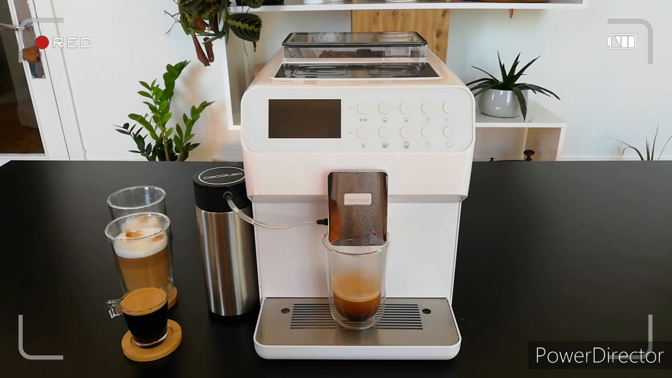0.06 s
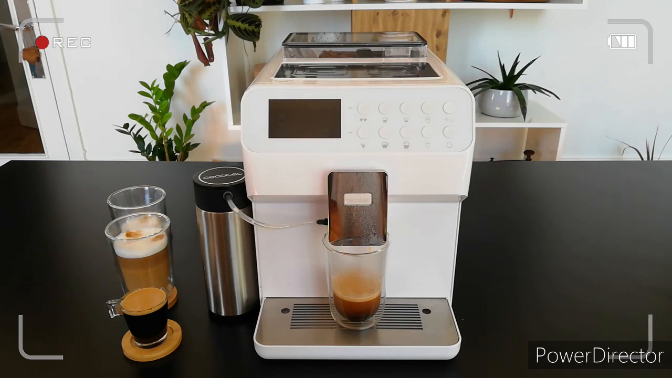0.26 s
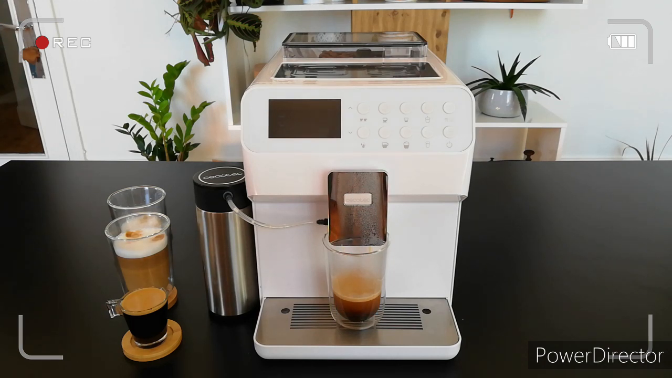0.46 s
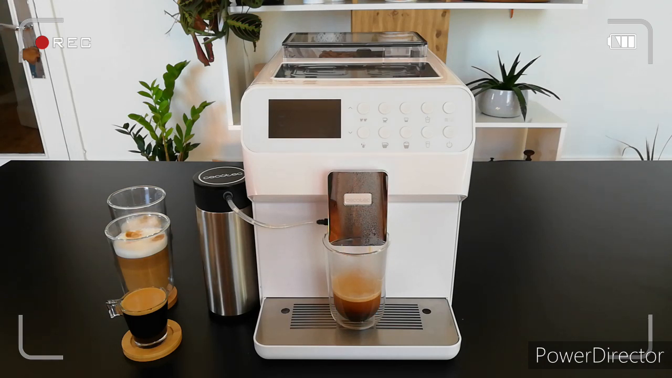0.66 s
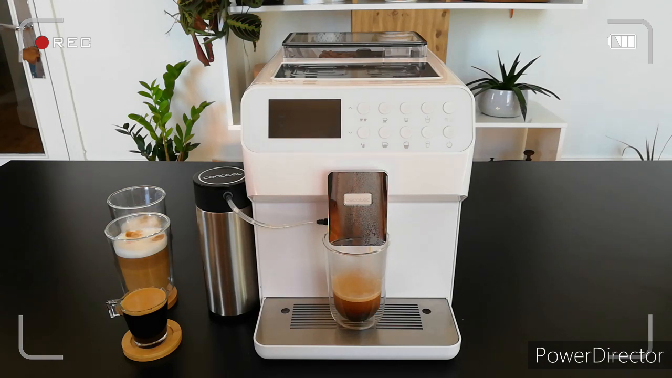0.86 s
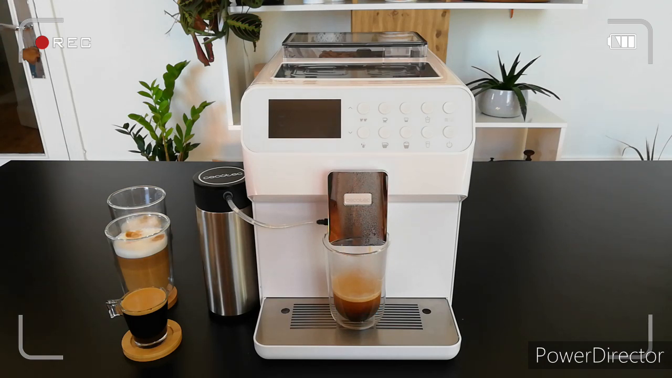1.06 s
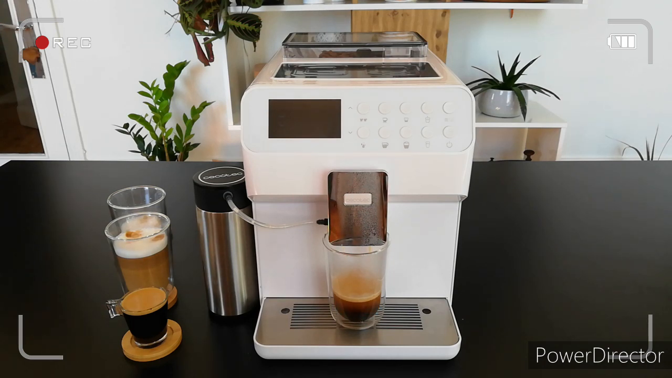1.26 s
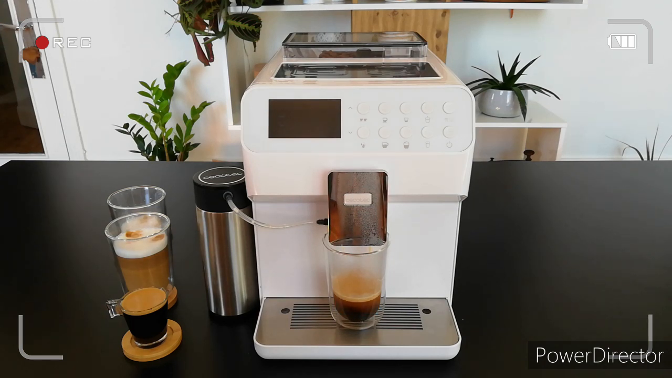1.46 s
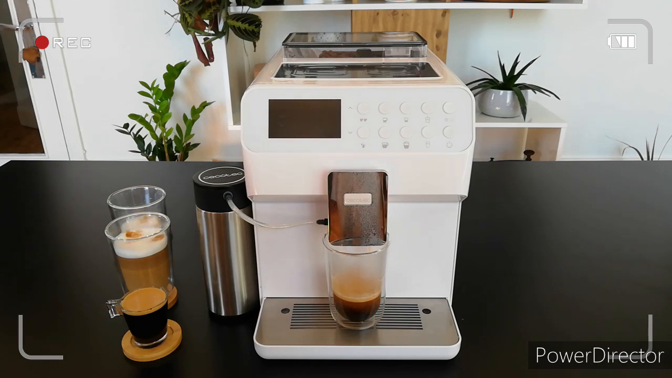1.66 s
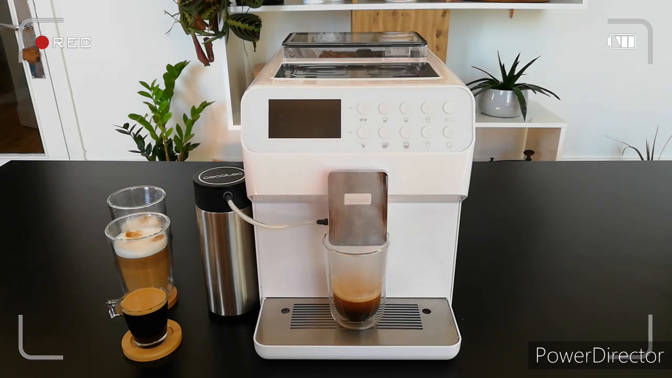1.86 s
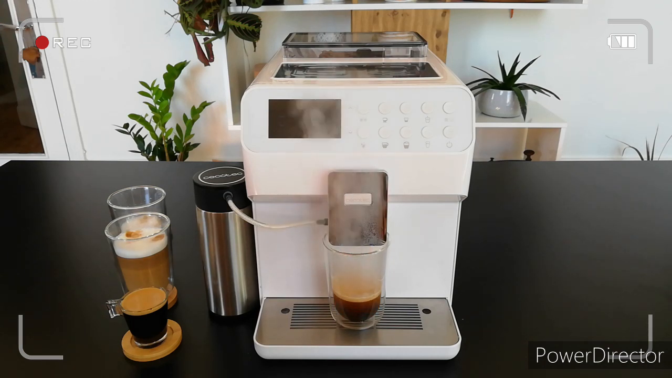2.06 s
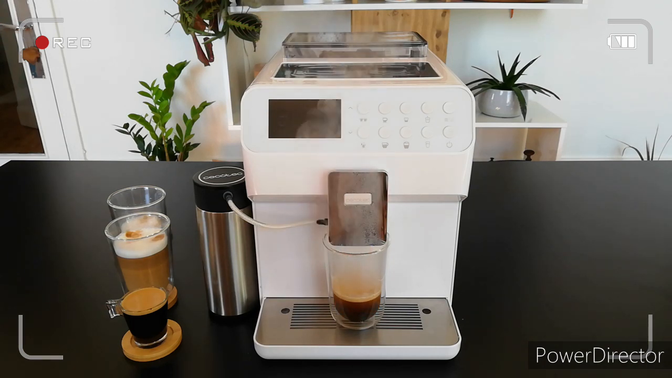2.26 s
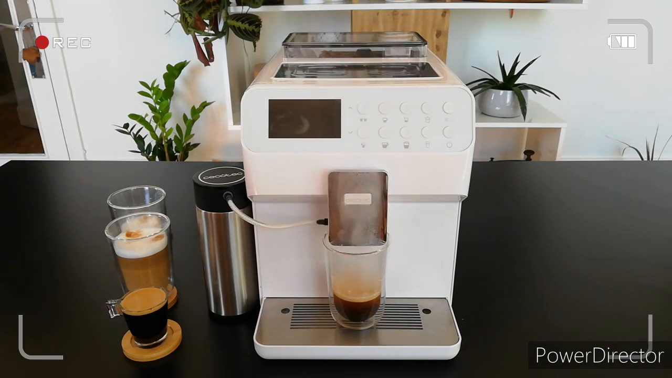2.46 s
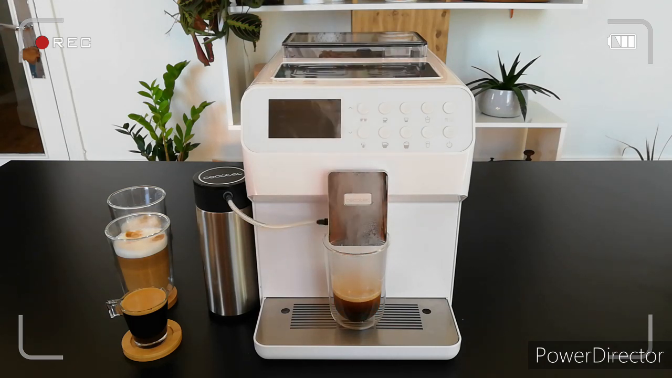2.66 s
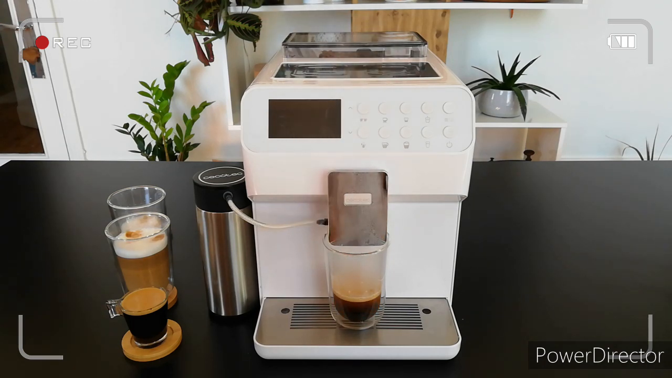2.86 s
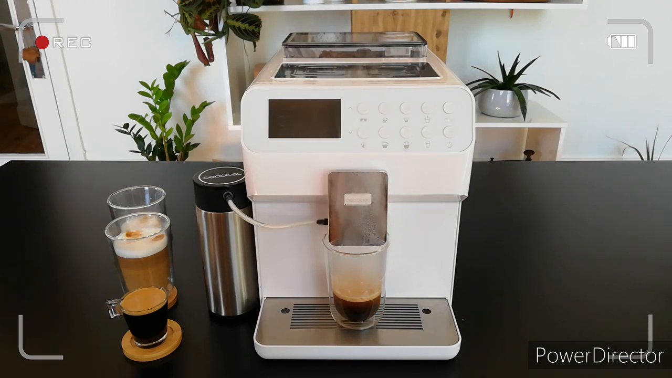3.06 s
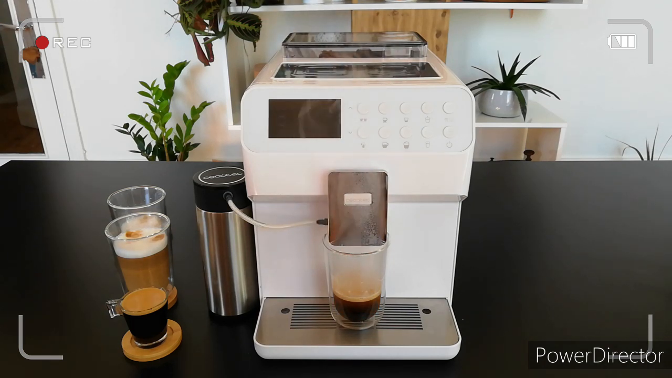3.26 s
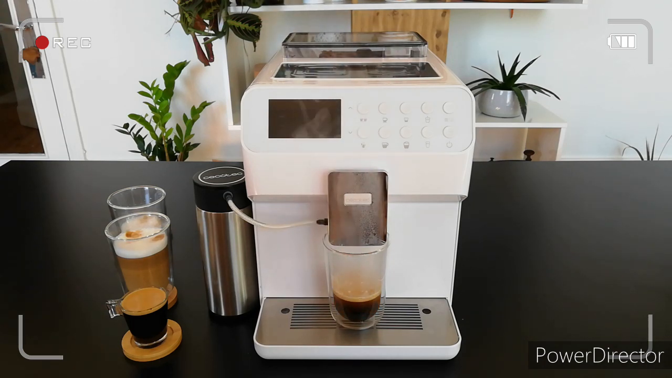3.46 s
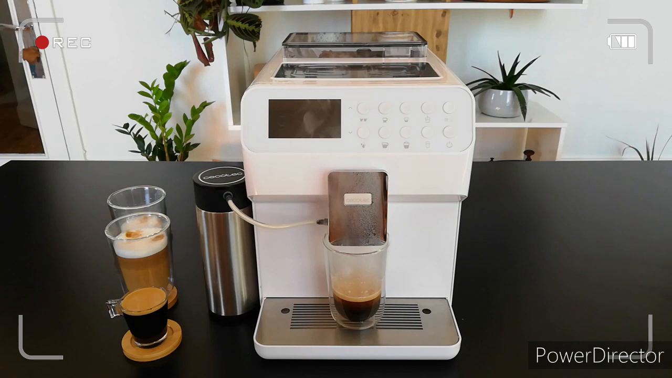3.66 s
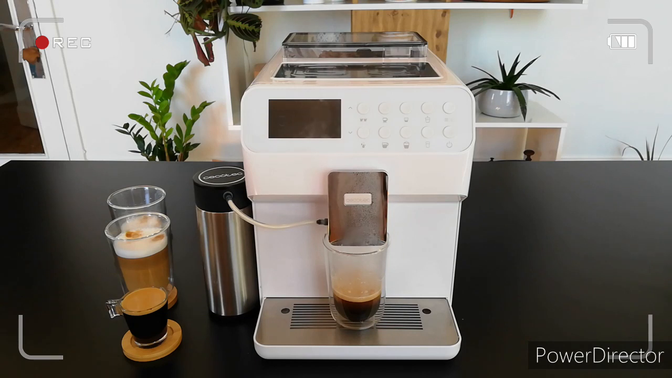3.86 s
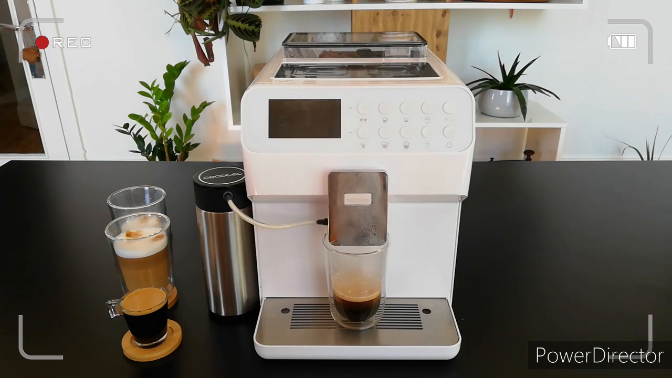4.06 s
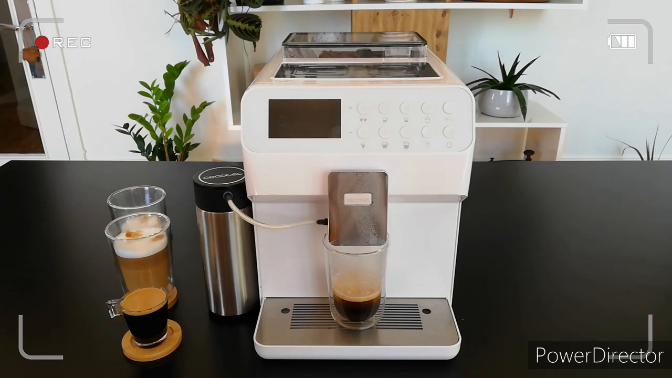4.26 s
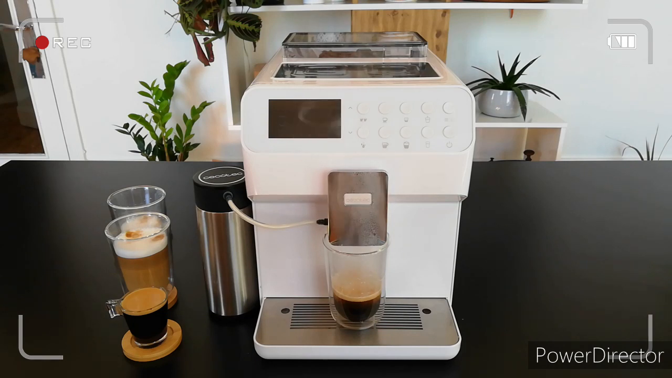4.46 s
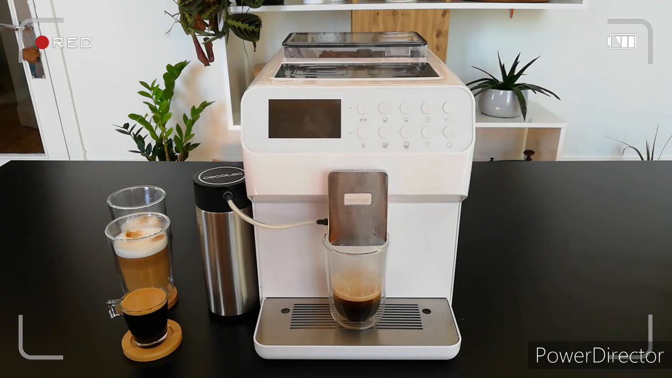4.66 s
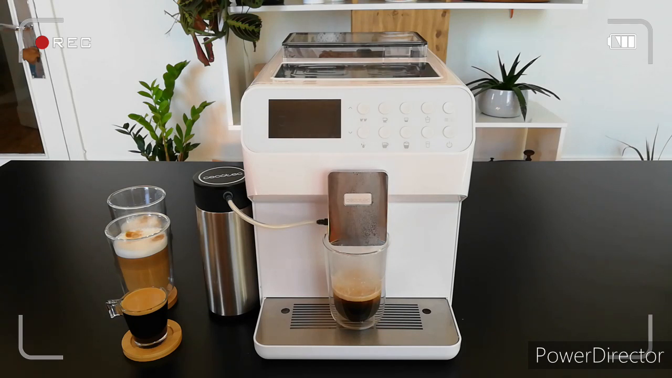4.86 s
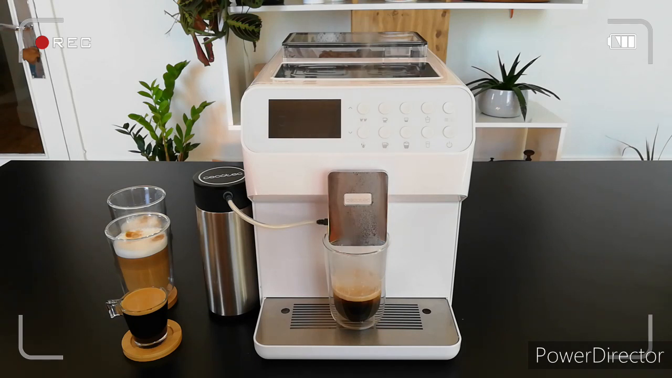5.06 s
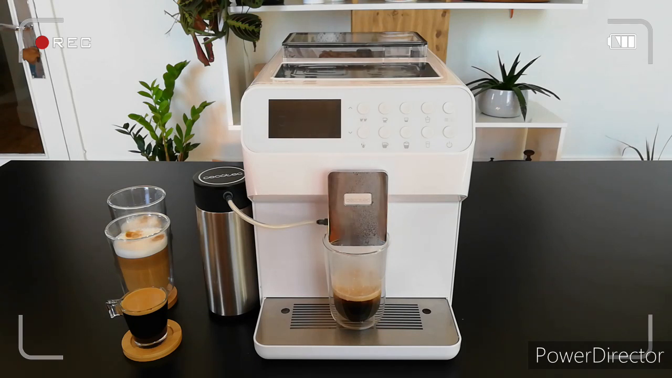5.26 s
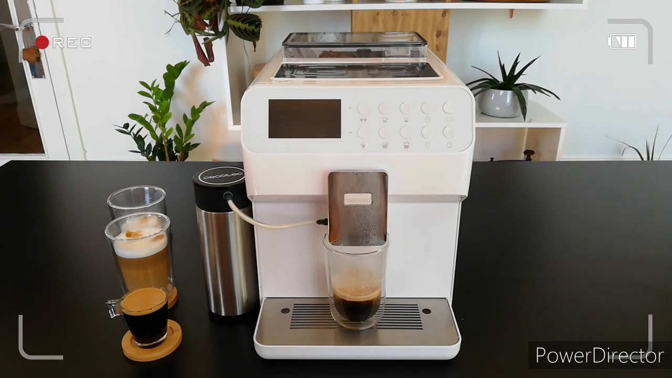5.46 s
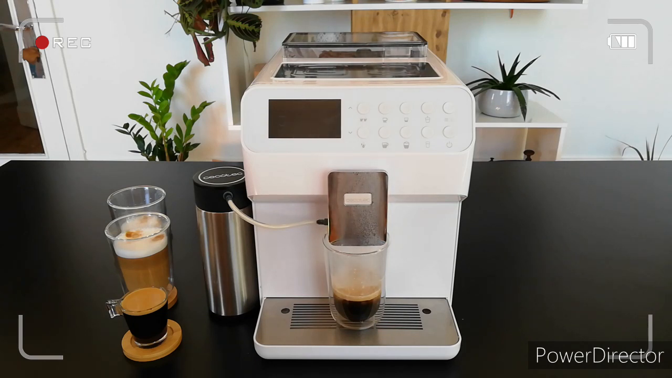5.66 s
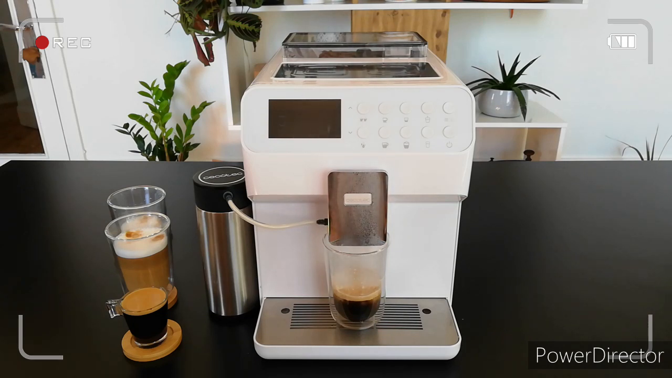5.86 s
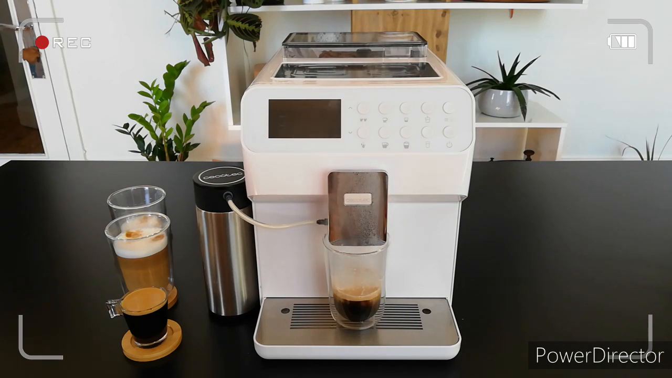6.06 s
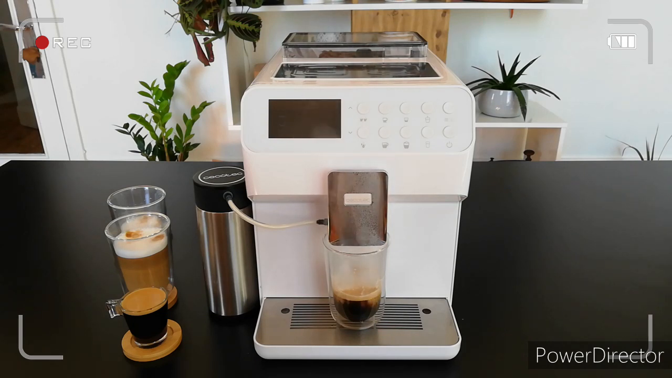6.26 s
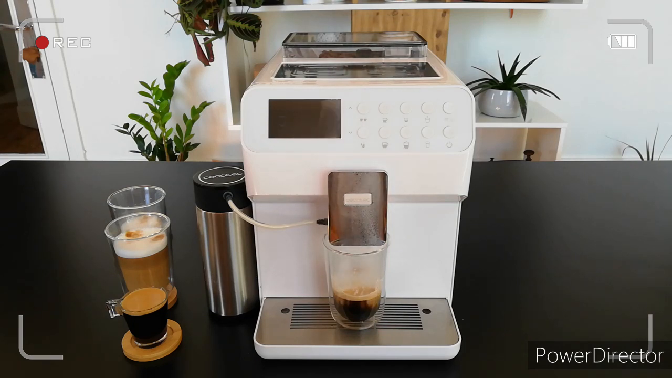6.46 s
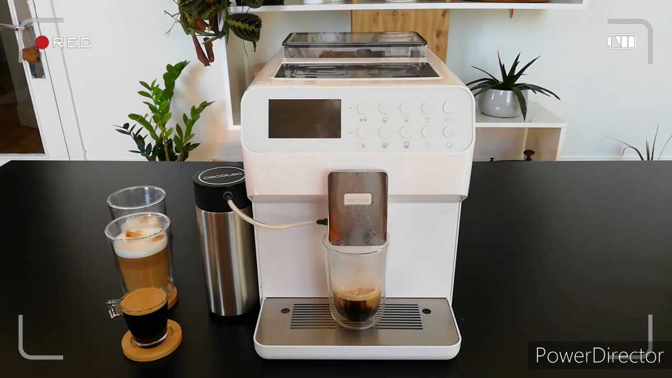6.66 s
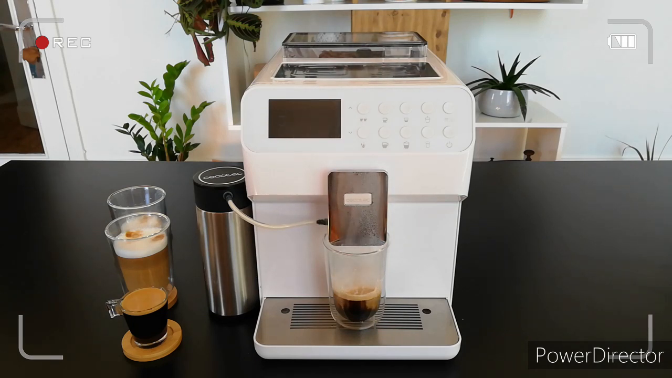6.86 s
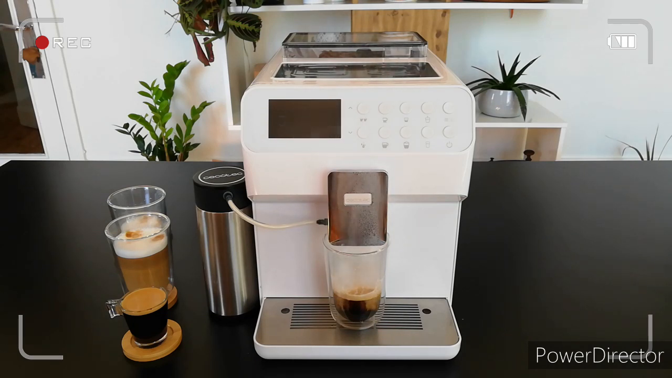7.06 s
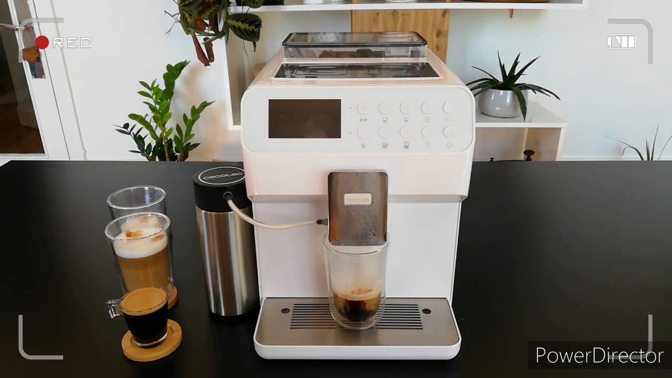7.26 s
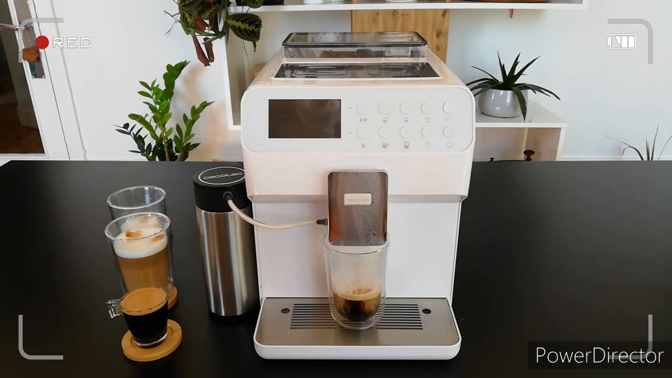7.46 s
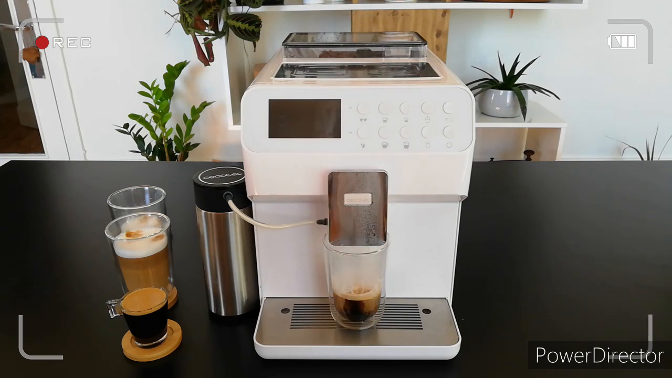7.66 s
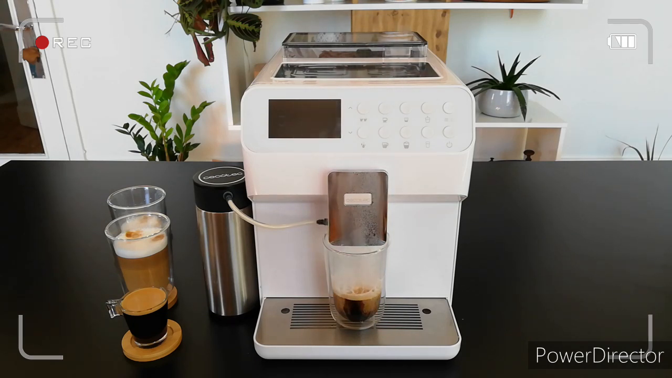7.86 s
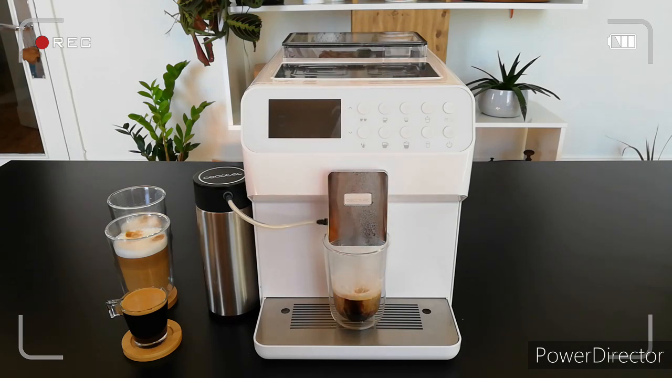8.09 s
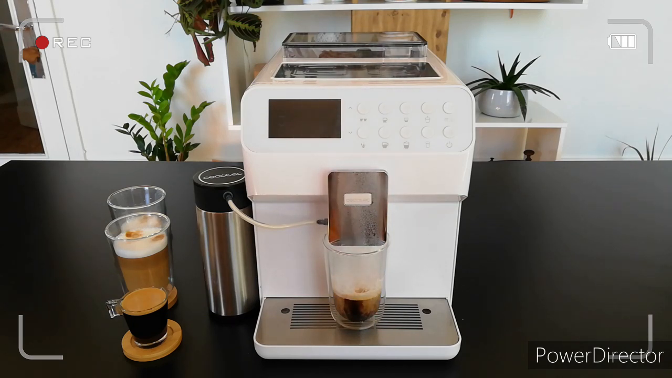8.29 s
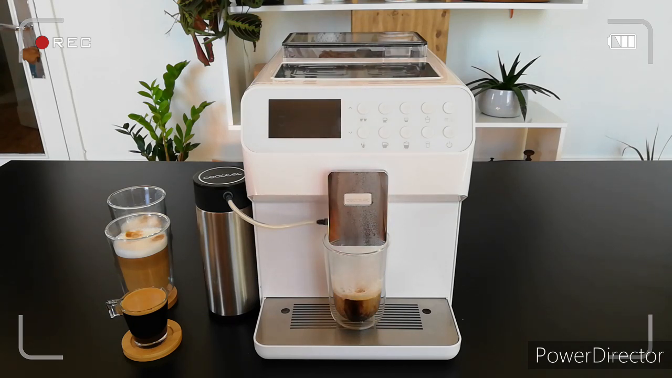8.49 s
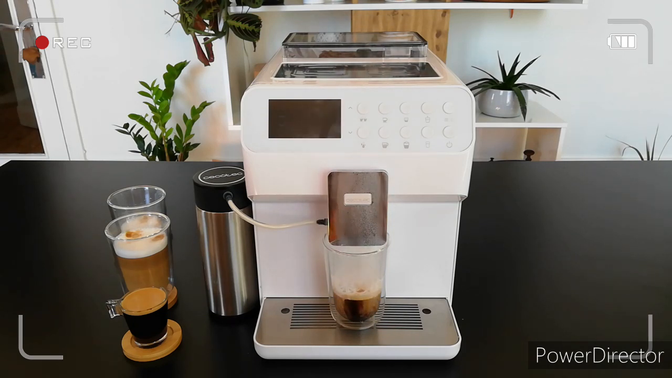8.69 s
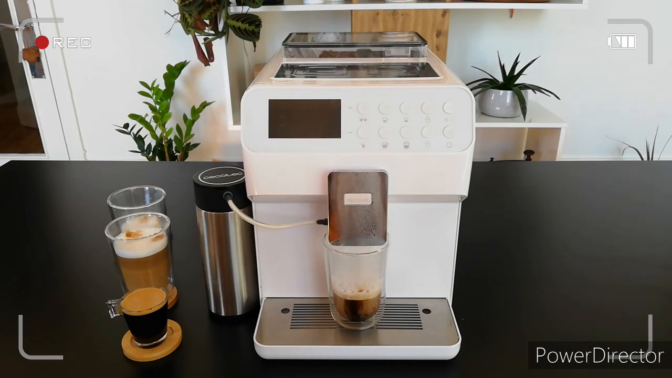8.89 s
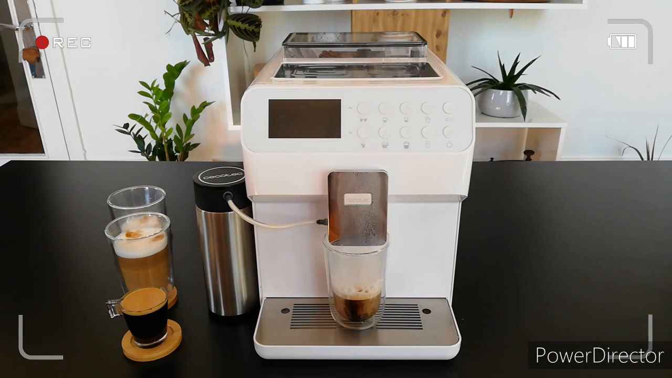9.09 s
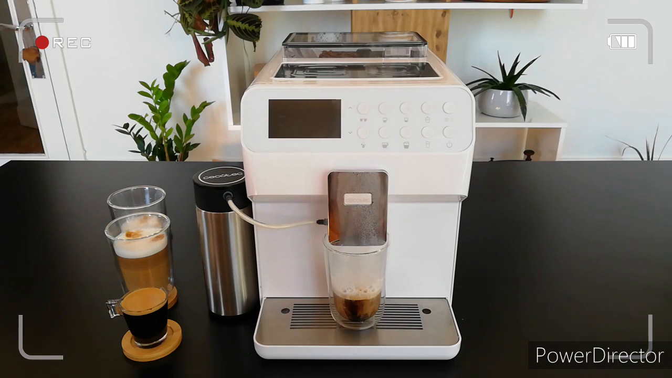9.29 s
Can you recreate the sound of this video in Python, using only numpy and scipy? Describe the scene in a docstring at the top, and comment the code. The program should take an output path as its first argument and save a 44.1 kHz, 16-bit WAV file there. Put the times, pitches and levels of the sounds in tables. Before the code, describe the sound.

Coffee machine whines briefly with plastic clicks, releases a burst of steam, then settles into steady hissing, bubbling milk froth with sputters and gurgles.

```python
"""An automatic coffee machine froths milk into a glass on a kitchen table.
A small geared motor (a harmonic series on a speed curve) whines and clicks as it sets the valve.
It twitches once more, a relay ticks, and the steam valve snaps open in a puff of shaped noise.
Steam hisses and spits (noise with droplets); milk bubbles (damped sines) burst in the spout
and gurgle into the glass. Faint hums and room noise lie beneath."""
import sys
import numpy as np
from scipy import signal
from scipy.fft import rfft, irfft, next_fast_len
from scipy.io import wavfile
from scipy.ndimage import uniform_filter1d, map_coordinates

SR = 44100
rng = np.random.default_rng(int(sys.argv[2]) if len(sys.argv) > 2 else 0)


def log_audio(samples):
    """Write samples as a 16-bit WAV file to the path given in sys.argv[1]."""
    # one column per channel
    frames = np.atleast_2d(samples).T
    # limit to full scale, then quantise
    limited = np.clip(frames, -1, 1)
    pcm = np.round(limited * 32767).astype(np.int16)
    wavfile.write(sys.argv[1], SR, pcm)


N = 411453

# spectra below list: f/Hz, density/dB (relative; the noise is scaled to rms 1)
# valve motor speed: t/s, gear pitch/Hz
MOTOR_SPEED = [(0.11, 128.3), (0.148, 136.3), (0.2, 141.8), (0.272, 141.8), (0.34, 144.7), (0.43, 149),
               (0.8, 147.7), (0.845, 146.8), (0.882, 134), (0.912, 133), (0.95, 136), (0.98, 132.5)]
# housing noise spectrum: f/Hz, density/dB
HOUSING_SPECTRUM = [(53, -47), (90, -31), (144, 2.5), (311, 1), (468, -3), (870, -3), (990, -10),
                    (1340, -5), (2230, -4.5), (4720, -20), (7730, -24), (8420, -23), (15000, -46)]
# gulps of milk reach the steam and boil up: t/s, length/s, lift/dB
MILK_SURGES = [(2.1, 0.12, 1.5), (2.165, 0.3, 7), (2.385, 0.099, 5), (2.505, 0.094, 2.5), (2.95, 0.16, 2.5),
               (3.64, 0.2, 2), (4.872, 0.21, 3.5), (5.068, 0.14, 2.5), (5.444, 0.29, 1.5), (5.628, 0.2, 3),
               (7.076, 0.14, 3), (7.97, 0.034, 6)]
VALVE_S = 1.596  # steam valve opens
CLEAR_S = 0.0055  # time the nozzle takes to clear
SWELL_S = 0.036  # rise time of a gulp or glug
FOAM_S, FOAM_BUILD_S = 2.33, 5.43  # foam starts to build; build time


def amp(db):
    """Decibels to gain."""
    return 10 ** (np.asarray(db) / 20)


def unit(x):
    """Scale to rms 1."""
    return x / np.sqrt(np.mean(x ** 2) + 1e-20)


def along(points, hz):
    """(Hz, value) points read on a log frequency axis."""
    f, v = np.transpose(points)
    return np.interp(np.log(hz + 1), np.log(f + 1), v)


def clock():
    """Time of each sample in s."""
    return np.arange(N) / SR


def curves(rows):
    """One value per sample for each column after the time."""
    s, *cols = np.transpose(rows)
    return [np.interp(clock(), s, c) for c in cols]


def ramp(start, length):
    """Rise from 0 to 1."""
    return np.clip((clock() - start) / length, 0, 1)


def swell(start, attack, hold, release):
    """Rise from 0 to 1, hold and fall back."""
    return ramp(start, attack) * (1 - ramp(start + attack + hold, release))


def wobble(rate, size=N):
    """Smooth random curve, rate knots per second."""
    coarse = np.arange(0, size + 64, 64)
    knots = rng.standard_normal(int(size * rate / SR) + 4)
    return np.interp(np.arange(size), coarse, map_coordinates(knots, [coarse * rate / SR]))


def resonance(hz, centre_hz, half_width_hz):
    """Bell of height 1 around a resonance."""
    return 1 / (1 + ((hz - centre_hz) / half_width_hz) ** 2)


def filtered(x, response):
    """x times a response of frequency."""
    size = next_fast_len(N + SR // 2)
    return irfft(rfft(x, size) * response(np.fft.rfftfreq(size, 1 / SR)), size)[..., :N]


def coloured(x, spectrum):
    """x shaped by the spectrum, at rms 1."""
    return unit(filtered(x, lambda hz: amp(along(spectrum, hz))))


def noise(spectrum):
    """Coloured noise of rms 1."""
    return coloured(rng.standard_normal(N), spectrum)


def thin(x):
    """High-pass near 100 Hz: small parts radiate no deep bass."""
    return filtered(x, lambda hz: 1 - 1 / (1 + (hz / 100) ** 6))


def pops(count, scatter_db):
    """Impulses of uneven size at random moments."""
    sizes = amp(scatter_db * rng.standard_normal(count).clip(-2, 2))
    return np.bincount(rng.integers(0, N, count), sizes, N)


def bubbles(centre_hz, spread, cycles, scatter_db, count, size):
    """Stream of damped sines, each at its own pitch, at rms 1."""
    start = rng.integers(0, N, count)
    pitch, strength = rng.standard_normal((count, 2)).clip(-2, 2).T
    centre = np.broadcast_to(centre_hz, N)[start]
    hz = centre * np.exp(np.broadcast_to(spread, N)[start] * pitch)
    turns = hz[:, None] * np.arange(size) / SR
    envelope = np.exp(-turns / cycles) * (1 - np.exp(-2 * turns))
    rings = np.sin(2 * np.pi * turns) * envelope
    rings *= (amp(scatter_db * strength) * rng.choice([-1, 1], count))[:, None]
    where = (start[:, None] + np.arange(size)).ravel()
    return unit(np.bincount(where, rings.ravel(), N)[:N])


def add(track, start, piece):
    """Mix a short sound into the track at a time in s."""
    room_left = track[int(start * SR):]
    room_left[:len(piece)] += piece[:len(room_left)]


def strike(attack, t60):
    """Envelope of a short event: quick rise times exponential decay."""
    age = np.arange(SR // 4) / SR
    return np.clip(age / attack, 0, 1) * amp(-60 * age / t60)


def ping(hz, rough, attack, t60):
    """Short ring whose phase drifts."""
    drift = rough * np.sqrt(hz / SR) * np.cumsum(rng.standard_normal(SR // 4))
    phase = 2 * np.pi * hz * np.arange(SR // 4) / SR + uniform_filter1d(drift, 20)
    return strike(attack, t60) * np.sin(phase)


def kitchen(x, near_db, room_db, side_db):
    """Direct sound, near reflections and room tail; side reflections widen all but the bass."""
    # decay of the room: f/Hz, t60/s
    room_decay = [(150, 0.55), (1500, 0.4), (6000, 0.81), (15000, 0.013)]
    # side level of the reflections: f/Hz, level/dB
    side_colour = [(250, -25), (450, -9), (700, 0), (1200, 1.5), (2200, -2), (5000, -4.5), (9000, 0),
                   (13000, 3)]
    hz, t, z = signal.stft(rng.standard_normal((2, SR // 2)), SR, nperseg=256)
    tail = signal.istft(z * amp(-60 * t / along(room_decay, hz)[:, None]), SR, nperseg=256)[1]
    age = np.arange(tail.shape[1]) / SR
    near = rng.standard_normal(tail.shape) * amp(-60 * age / 0.1) * (age > 0.005)
    near *= amp([[near_db], [side_db]]) / np.linalg.norm(near[0])
    echo = amp(room_db) * tail * (age > 0.008) / np.linalg.norm(tail[0]) + near
    mid, side = signal.fftconvolve(x[None], echo, axes=1)[:, :N]
    side = filtered(side, lambda f: amp(along(side_colour, f)))
    power = 1 + amp(room_db) ** 2 + amp(near_db) ** 2
    return np.array([x + mid + side, x + mid - side]) / np.sqrt(power)


def quiet():
    """Room quiet: steady shaped noise."""
    # f/Hz, density/dB
    quiet_spectrum = [(15, -29), (25, -1), (66, -5), (1050, -19.5), (3530, -21.5), (3830, -20), (4260, -23),
                      (7700, -23.5), (8580, -20), (9300, -23), (15500, -28)]
    return amp(-66.0) * noise(quiet_spectrum)


def hum():
    """Faint low machine hums: sines that fade in and out and waver in level and phase."""
    # f/Hz, level/dB, on/s, off/s
    hum_tones = [(118, -72, 0.84, 1.8), (147.2, -64.5, 5.3, 9.5), (55.2, -79.5, 5.4, 9.5),
                 (222.6, -68, 5.9, 12)]
    fade_s = 0.15
    total = np.zeros(N)
    for hz, db, on, off in hum_tones:
        level = amp(db + 1.3 * wobble(4.5))
        tone = np.sin(2 * np.pi * hz * clock() + 0.53 * wobble(5.6))
        total += level * tone * ramp(on, fade_s) * (1 - ramp(off, fade_s))
    return np.sqrt(2) * total


def relay():
    """A relay ticks just before the valve opens: a tiny bright noise tick with a faint ring."""
    # f/Hz, density/dB
    relay_spectrum = [(300, -30), (4000, -15), (6000, -7), (9000, -2), (12000, 12), (15500, -1)]
    relay_s, relay_db, ring_db = 1.5097, -40, -18  # ring relative to tick
    tick = np.zeros(N)
    ring = amp(ring_db) * strike(attack=0.001, t60=0.13)
    add(tick, relay_s, strike(attack=0.0003, t60=0.014) + ring)
    return amp(relay_db) * tick * noise(relay_spectrum)


def rasp():
    """The cam scrapes over a ridge in short bursts of slips."""
    # t/s, length/s, level/dB
    rasp_bursts = [(0.489, 0.019, -37), (0.879, 0.026, -36.5), (0.963, 0.037, -51)]
    # f/Hz, density/dB
    rasp_spectrum = [(600, -42), (1700, -28), (2080, 1), (2280, 7), (2480, -1), (2800, -25), (6000, -25),
                     (15000, -42)]
    level = sum(amp(db) * swell(s, 0.0035, length / 3, 2 * length / 3) for s, length, db in rasp_bursts)
    slips = unit(pops(count=7000, scatter_db=1)) + 0.5 * rng.standard_normal(N)
    return level * coloured(slips, rasp_spectrum)


def shell():
    """One knock's ring of the plastic housing: modes whose levels vary each time."""
    # f/Hz, level/dB, t60/s
    shell_modes = [(311, -1, 0.11), (400, -3, 0.09), (680, -4, 0.12), (860, -3, 0.07), (1400, -4, 0.05),
                   (2230, 1, 0.05)]
    return sum(amp(db + rng.normal(0, 2)) * ping(hz, rough=0.2, attack=0.0008, t60=t60)
               for hz, db, t60 in shell_modes)


def clicks_and_bumps():
    """Sharp clicks (cam and valve, later one hard spit of the steam), short rough bumps, a low groan."""
    # sharp clicks: the cam and valve at first, later one hard spit of the steam:
    # t/s, level/dB, housing knock re click/dB, t60/s
    clicks = [(0.2423, -56, -14, 0.06), (0.417, -28, -8, 0.19), (0.498, -40, 7, 0.06),
              (0.506, -41.5, 5, 0.065), (0.66, -30, -18, 0.06), (0.8744, -37, -16, 0.068),
              (0.9867, -31, -18, 0.1), (1.0153, -26.5, -12, 0.056), (1.2186, -42, -35, 0.044),
              (4.272, -18, -16, 0.082)]
    # short rings and bumps: t/s, level/dB, f/Hz, t60/s
    bump_rows = [(0.16, -42, 302, 0.16), (0.243, -46.5, 4660, 0.099), (0.506, -35.5, 311, 0.21),
                 (0.511, -39, 163.5, 0.53), (0.57, -42, 165.3, 0.2), (0.654, -46, 228, 0.18),
                 (0.72, -49, 212.2, 0.2), (0.838, -41, 294, 0.18), (0.846, -41, 393, 0.2),
                 (0.945, -39.5, 659, 0.18), (0.952, -42, 355, 0.15), (1.272, -52, 383, 0.09),
                 (1.6, -42, 475, 0.16), (1.648, -34.5, 340, 0.16)]
    # sharp click: f/Hz, density/dB
    crack_spectrum = [(300, -40), (1500, -22), (3500, 10), (6000, 5), (9000, 3), (12000, 1), (15000, 2.5)]
    groan_s, groan_rise_s, groan_fall_s, groan_db, groan_hz = 0.15, 0.17, 0.15, -41, 336.6
    cracks, knocks, bumps = np.zeros((3, N))
    for s, db, knock_db, t60 in clicks:
        add(cracks, s, amp(db - 16.0) * strike(attack=0.00038, t60=t60))
        add(knocks, s, amp(db + knock_db - 7.5) * strike(attack=0.001, t60=0.16))
        add(bumps, s, amp(db + knock_db - 13) * shell())
    for s, db, hz, t60 in bump_rows:
        add(bumps, s, amp(db) * ping(hz, rough=0.45, attack=0.005, t60=t60))
    # the cam groans as it starts to turn
    groan = np.sin(2 * np.pi * groan_hz * clock() + 0.69 * wobble(88.1))
    groan *= amp(groan_db + 2.5 * wobble(38.0))
    groan *= np.sqrt(2) * swell(groan_s, groan_rise_s, 0, groan_fall_s)
    return cracks * noise(crack_spectrum) + thin(knocks * noise(HOUSING_SPECTRUM) + bumps + groan)


def load():
    """Motor load, 0-1: the harder it pushes, the slower it turns."""
    free_hz, full_load_sag_hz = 145.4, 11
    return np.clip((free_hz - curves(MOTOR_SPEED)[0]) / full_load_sag_hz, 0, 1)


def running(attack, coast):
    """Drive gain: spins up, runs, dies away around switch-off, offset by coast."""
    on_s, off_s, decay_db_per_s = 0.098, 0.985, 328
    since_off = np.maximum(clock() - off_s - coast, 0)
    return ramp(on_s, attack) ** 2 * amp(-decay_db_per_s * since_off)


def rattle():
    """Gear teeth chatter in the housing, louder under load; a short nudge of the drive follows."""
    # f/Hz, density/dB
    nudge_spectrum = [(88, -52), (150, -19), (337, -6.5), (409, -14), (567, -4), (720, -4.5), (883, -2),
                      (991, -11.5), (2100, -8), (2550, -10.5), (3090, -24.5), (5500, -32.5), (15000, -43)]
    rattle_db, rattle_load_db = -55, 7.5  # running free; added at full load
    nudge_s, nudge_rise_s, nudge_hold_s = 1.308, 0.018, 0.028
    nudge_db, nudge_fall_db_per_s = -41.5, 240
    teeth = unit(pops(count=20000, scatter_db=3.5)) + rng.standard_normal(N)
    teeth *= amp(1.6 * wobble(170))  # loose teeth strike in uneven clusters
    run = amp(rattle_db + rattle_load_db * load()) * running(attack=0.024, coast=0.023)
    since_peak = np.maximum(clock() - nudge_s - nudge_rise_s - nudge_hold_s, 0)
    nudge = ramp(nudge_s, nudge_rise_s) * amp(nudge_db - nudge_fall_db_per_s * since_peak)
    return run * coloured(teeth, HOUSING_SPECTRUM) + nudge * coloured(teeth, nudge_spectrum)


def motor():
    """Gear tones scoop up to speed, then sag and harden as the cam pushes against its stop."""
    # gear tones: multiple of gear pitch, level/dB
    gear_tones = [(1, -9), (2, -13), (3, -11), (4, -6), (5, -2), (6, 0), (7, -12), (8, -14), (9, -10),
                  (10, 0), (11, -4), (12, -10), (13, -8), (14, -13), (15, -1), (16, -14), (17, -15),
                  (18, -12), (20, 0), (25, -18), (28, -19), (30, -19)]
    # panels ring when a gear tone passes them: f/Hz, half width/Hz, lift/dB
    panel_modes = [(141.6, 3.8, 13), (690, 52, 9.5), (1450, 10, 11.5), (2184, 15, 7.5)]
    whine_db, whine_load_db = -48.5, 5.5  # running free; added at full load
    waver_depth_db, slop_rad = 2.3, 0.25
    size = 2 * SR  # the motor has stopped by then
    pitch_hz, effort = curves(MOTOR_SPEED)[0][:size], load()[:size]
    jitter = (0.002 + 0.006 * effort) * wobble(90, size)
    turns = np.cumsum(pitch_hz * (1 + jitter)) / SR
    teeth = 5
    mesh_db = 7 * effort  # under load the tooth-mesh tones stand out
    whine = np.zeros(N)
    for k, db in gear_tones:
        waver_db = waver_depth_db * wobble(26, size)
        slop = slop_rad * (1 + effort) * wobble(130, size)
        panel_db = sum(lift * resonance(k * pitch_hz, hz, width) for hz, width, lift in panel_modes)
        level = amp(db + waver_db + panel_db - mesh_db * (k % teeth > 0))
        whine[:size] += level * np.sin(2 * np.pi * (k * turns + rng.random()) + slop)
    whine /= np.linalg.norm([amp(db) for k, db in gear_tones]) / np.sqrt(2)
    return whine * amp(whine_db + whine_load_db * load()) * running(attack=0.06, coast=-0.015)


def valve():
    """The trapped pressure escapes in one decaying puff of noise."""
    # f/Hz, density/dB
    puff_spectrum = [(59, -43), (100, -17), (467, 3.5), (697, -15), (1260, 0), (1430, -7), (2180, 3),
                     (3850, -12), (5630, -2), (6810, -8), (8230, -8.5), (9950, -13), (15500, -14)]
    pressure = np.zeros(N)
    add(pressure, VALVE_S - 0.002, strike(attack=0.0044, t60=0.34) ** 2)  # squaring halves the t60
    return amp(-24.5) * pressure * noise(puff_spectrum)


def supply():
    """Steam gain: nothing until just after the valve opens, then the line fills."""
    start = VALVE_S + 0.02
    fill_s, fill_db = 0.05, -20  # fill time; level at its start
    return ramp(start, 0.02) * amp(fill_db * (1 - ramp(start, fill_s)))


def blast():
    """Stored pressure blows off first, until milk is drawn up the tube; 0-1."""
    return swell(1.701, attack=0.044, hold=0.24, release=0.41)


def roar():
    """The blast roars in the empty spout: a swell of shaped noise."""
    # f/Hz, density/dB
    roar_spectrum = [(100, -40), (200, -7), (350, -1), (560, -0.5), (700, -2), (870, 5), (1150, -7),
                     (1400, 1), (1700, -16), (2100, 1), (2700, -18), (3600, -13), (4300, -40)]
    return amp(-39.5) * swell(1.715, attack=0.022, hold=0.14, release=0.25) * noise(roar_spectrum)


def slurp():
    """The first milk meets the steam at the nozzle in a bright spray of tiny bubbles."""
    # f/Hz, density/dB
    slurp_spectrum = [(900, -44), (1700, -6), (2400, 5), (2750, -9), (3300, -11), (3800, -24), (8000, -43)]
    spray = coloured(pops(count=16000, scatter_db=1), slurp_spectrum)
    return amp(-35) * swell(2.11, CLEAR_S, hold=0.089, release=0.08) * spray


def glugs():
    """Each pocket of air rings the milk tube at its own unsteady pitch."""
    # t/s, length/s, level/dB, f/Hz
    air_glugs = [(1.73, 0.21, -44, 216.5), (2.375, 0.14, -49, 195.5), (2.97, 0.18, -55, 222),
                 (3.26, 0.2, -47, 146), (3.497, 0.08, -48, 147), (3.764, 0.12, -46.5, 228),
                 (3.8, 0.1, -50, 305), (4.566, 0.2, -47, 220), (4.98, 0.17, -51, 212.4),
                 (8.625, 0.27, -50, 305)]
    drift, flicker = 1.3 * wobble(55), amp(2 * wobble(45))
    tones = np.zeros(N)
    for s, length, db, hz in air_glugs:
        level = amp(db) * swell(s, SWELL_S, length / 2, length / 2)
        tones += level * np.sin(2 * np.pi * hz * clock() + drift)
    return flicker * tones


def gulps(rows):
    """Lift in dB of swells that rise quickly, then ebb over the second half of their length."""
    return sum(db * ramp(s, SWELL_S) * (1 - ramp(s + length / 2, length / 2)) for s, length, db in rows)


def starving():
    """Dip in dB while the milk runs thin after the first gulp."""
    return -5 * swell(2.59, attack=0.19, hold=0, release=0.19)


def glass(x):
    """Air above the milk colours x: a moving notch or lift, and resonances that come and go."""
    # moving notch (or lift): t/s, f/Hz, gain/dB
    hollow = [(1.7, 1150, 0), (2.2, 1180, -4.5), (2.8, 1280, -4), (3.5, 1400, -10.5), (4.3, 1460, -2),
              (5.2, 1490, -1), (6, 1560, 2), (6.6, 1720, -0.5), (7.6, 1670, -5), (8.4, 1680, -0.5)]
    # resonances of the glass: on/s, off/s, f/Hz, half width/Hz, lift/dB
    glass_modes = [(2.91, 5.9, 1270, 40, 5.5), (5.85, 7.9, 1535, 21.7, 10), (6.25, 8.1, 1416, 26, 6.5),
                   (6.8, 7.3, 2800, 90, 6), (8.6, 9.5, 1690, 40, 0.5)]
    fade_s, hollow_half_width_hz = 0.28, 48
    hz, t, z = signal.stft(x, SR, nperseg=2048, noverlap=1536)
    hz = hz[:, None]
    hollow_hz, hollow_db = (np.interp(t, clock(), c) for c in curves(hollow))
    gain_db = hollow_db * resonance(hz, hollow_hz, hollow_half_width_hz)
    for on, off, centre, width, lift in glass_modes:
        present = np.interp(t, clock(), ramp(on, fade_s) * (1 - ramp(off, fade_s)))
        gain_db = gain_db + lift * present * resonance(hz, centre, width)
    return signal.istft(z * amp(gain_db), SR, nperseg=2048, noverlap=1536)[1][:N]


def pour():
    """Foam splashes into the glass; larger bubbles gurgle in the milk tube and calm as foam builds."""
    # f/Hz, density/dB
    splash_spectrum = [(140, -55), (230, -8.5), (258, -19), (307, -4), (359, -9.5), (399, -4.5), (482, -8),
                       (512, -9.5), (540, -7), (583, -11.5), (668, -10), (748, -10.5), (806, -5.5),
                       (959, -3), (1400, -5), (1820, -6.5), (3080, -120)]
    # f/Hz, density/dB
    gurgle_spectrum = [(30, -50), (70, -30), (95, -2), (122, -6), (147, -0.5), (182, -3), (215, 2),
                       (255, -4), (330, -8), (600, -50)]
    splash_db, splash_growth_db, splash_blast_db = -44, 2.5, 3.5  # at first; foam adds; blast adds
    gurgle_start_db, gurgle_calm_db = -52, -6.5  # at first; change as foam builds
    foam = ramp(FOAM_S, FOAM_BUILD_S)
    level_db = splash_db + splash_growth_db * foam + splash_blast_db * blast()
    level_db += starving() + 0.34 * gulps(MILK_SURGES)
    gurgle_db = gurgle_start_db + gurgle_calm_db * foam
    drops = unit(pops(count=14000, scatter_db=3)) + rng.standard_normal(N)
    gurgle = bubbles(centre_hz=195, spread=0.3, cycles=2, scatter_db=1, count=2200, size=1800)
    liquid = amp(level_db) * coloured(drops, splash_spectrum)
    liquid += amp(gurgle_db) * coloured(gurgle, gurgle_spectrum)
    return thin(liquid * supply() + glugs())


def big_bubbles():
    """Now and then a large bubble pops with a short ping near 1900 Hz."""
    # t/s, level/dB
    biggest = [(4.779, -24), (4.9468, -18), (5.0968, -16), (5.698, -19), (5.722, -15), (6.752, -17.5),
               (7.446, -24), (7.488, -17.5), (7.985, -18), (8.056, -16), (8.4067, -16), (8.955, -20),
               (9.156, -22)]
    track = np.zeros(N)
    for s, db in biggest:
        hz = 1900 * np.exp(0.05 * rng.standard_normal())
        add(track, s, amp(db) * ping(hz, rough=0.3, attack=0.0015, t60=0.026))
    return track


def throttle():
    """Nozzle flow in dB: slightly unsteady; at times it clogs gradually, then breaks free."""
    # t/s, clogging time/s, dip/dB
    choke_rows = [(2.732, 0.076, 0), (4.52, 0.045, -4), (4.742, 0.032, -8), (4.984, 0.046, -8),
                  (5.123, 0.069, -6.5), (5.912, 0.05, -6), (6.72, 0.12, -4), (6.973, 0.058, -9),
                  (7.62, 0.045, -7), (7.735, 0.052, -7)]
    chokes = sum(db * swell(s, length, 0, CLEAR_S) for s, length, db in choke_rows)
    return chokes + 0.25 * wobble(24)


def froth(flow_db):
    """Milk bubbles burst in the spout, hundreds a second; once foam lines it, its resonances ring."""
    # bubbles in the spout: t/s, centre pitch f/Hz, pitch scatter/natural log
    bubble_size = [(1.7, 1970, 0.16), (2.4, 1940, 0.38), (2.9, 1810, 0.16), (4, 1894, 0.11),
                   (5, 1960, 0.088), (7.2, 1987, 0.1), (8.1, 1900, 0.09), (9.33, 1844, 0.13)]
    # spout: f/Hz, density/dB
    spout_spectrum = [(100, -70), (900, -26), (1400, -13), (1550, -4), (1700, 3.5), (2000, 3.5),
                      (2200, -0.5), (2500, 1.5), (2700, -0.5), (3500, -6), (5000, -25)]
    # narrow resonances around spout and glass: f/Hz, level/dB
    spout_modes = [(1421, -3), (1523, -3), (1599, -5), (1680, -2), (1728, 0), (1825, -1), (1951, 0),
                   (2016, -1), (2105, -2), (2150, -2), (2231, -3), (2277, -3), (2328, -4), (2511, -1)]
    # spluttering before foam lines the spout: f/Hz, density/dB
    splutter_spectrum = [(710, -39), (1200, -47), (1480, 6.5), (1860, -3), (2050, 6.5), (2450, 0.5),
                         (2760, -18), (4000, -34), (5200, -56), (8800, -120)]
    froth_db, froth_growth_db = -38, 5  # at first; added as foam builds
    plink_db, choke_share, mode_width_hz = -7.5, 0.63, 34  # share: how much of a choke is felt
    centre_hz, spread = curves(bubble_size)
    burst = bubbles(centre_hz, spread, cycles=2.73, scatter_db=0.0, count=6500, size=450)
    direct = coloured(burst, spout_spectrum)

    def modes(f):
        damping = 1j * f * mode_width_hz
        return sum(amp(db) * damping / (c * c - f * f + damping) for c, db in spout_modes)

    ring = filtered(direct, modes)
    lined = ramp(2.37, 0.573)
    splutter = coloured(burst + 4.0 * rng.standard_normal(N), splutter_spectrum)
    bubbling = np.sqrt(1 - lined) * splutter + np.sqrt(lined) * unit(direct + 2.5 * unit(ring))
    level_db = froth_db + froth_growth_db * ramp(FOAM_S, FOAM_BUILD_S)
    level_db += gulps(MILK_SURGES) + starving() + choke_share * flow_db
    level_db += 0.8 * wobble(14)  # bubbles come in clusters
    # a few bubbles ring on
    plinks = bubbles(centre_hz, spread=0.1, cycles=17, scatter_db=4.5, count=700, size=1300)
    return amp(level_db) * (bubbling + amp(plink_db) * lined * plinks) * supply()


def sputter():
    """Wet steam comes through in quick lumps, as dB; slower drift is removed."""
    lumps = wobble(100)
    return 1.7 * unit(lumps - uniform_filter1d(lumps, size=1500))


def flutter(x, patchy_db, top_db):
    """Short patches of random gain across the bands, and a moving lift of the top octave."""
    hz, t, z = signal.stft(x, SR, nperseg=128)
    patch = np.outer(np.hanning(11), np.hanning(21))
    field = signal.convolve(rng.standard_normal(z.shape), patch, mode="same")
    tilt = along([(7000, -0.5), (10000, -0.44), (13000, 0.7)], hz)
    gain = amp(patchy_db * unit(field) + np.outer(tilt, np.interp(t, clock(), top_db)))
    return signal.istft(z * gain, SR, nperseg=128)[1][:N]


def steam(flow_db):
    """The jet hisses, spits as slugs of liquid clear it, and changes colour as the nozzle fills."""
    # spits: t/s, fall time/s, lift/dB
    spit_rows = [(2.545, 0.027, 9), (2.678, 0.02, 4), (2.92, 0.28, 2.5), (3.223, 0.033, 4.5),
                 (4.092, 0.076, 5.5), (4.577, 0.025, 8), (4.697, 0.06, 4), (4.794, 0.14, 5),
                 (4.948, 0.049, 6.5), (5.21, 0.17, 2), (5.497, 0.16, 3), (5.7, 0.24, 2), (5.75, 0.043, 4.5),
                 (5.96, 0.04, 0), (6.916, 0.08, 5), (7.285, 0.06, 2.5), (7.544, 0.07, 3), (7.832, 0.03, 0),
                 (8.957, 0.1, 2), (9.167, 0.066, 3)]
    # t/s, nozzle state (0 dry, 1 milk, 2 foam)
    nozzle_fill = [(1.7, 0.041), (2.1, 0.082), (2.6, 0.35), (4, 0.45), (5.9, 1.48), (6.7, 1.89),
                   (9.33, 2.08)]
    # nozzle dry, drawing milk, full of foam; each: f/Hz, density/dB
    dry_spectrum = [(1760, -21.5), (3000, -22.5), (3440, -22), (3740, -40), (4200, -19.5), (4560, -29),
                    (4990, -18.5), (5880, -6.5), (6890, -8.5), (8640, -17.5), (10100, -3.5), (11000, -12),
                    (12800, -0.5), (13800, -16), (15500, -4)]
    milk_spectrum = [(1760, -21), (3000, -4.5), (3130, -7), (3840, -14.5), (4440, -13.5), (5720, 1.5),
                     (6170, -1), (6660, 6), (8470, -5.5), (9980, -1), (11000, -19), (11400, -10),
                     (12800, -9), (14100, -9), (15500, -10.5)]
    foam_spectrum = [(1760, -18.5), (3000, -8.5), (3560, -11), (3870, -16), (4060, -12.5), (4690, -10.5),
                     (5450, -3), (6520, -9), (8580, -8), (9850, -1), (11600, -8.5), (12600, 0.5),
                     (14000, -7), (14900, -1), (15500, -4.5)]
    # narrow nozzle resonances: f/Hz, half width/Hz, lift/dB
    nozzle_modes = [(10000, 54, 3.5), (11540, 59, 6), (12600, 50, 4.5)]
    # top-octave tilt control: t/s, tilt/dB
    sharpness = [(1.7, -3), (3.9, -2), (4.75, 6.5), (5.6, 5.5), (6.7, -3), (8.7, -4), (9.2, -0.5)]
    jet_db, sag_db_per_s, blast_db = -37, 0.09, 13.5  # the boiler slowly loses pressure
    spit_db = sum(db * swell(s, CLEAR_S, 0, length) for s, length, db in spit_rows)
    rush = blast()
    hiss_db = jet_db - sag_db_per_s * (clock() - VALVE_S) + blast_db * rush
    hiss_db += (1 - rush) * (flow_db + sputter()) + spit_db
    fill, = curves(nozzle_fill)
    droplet_decay = np.exp(-1 / (0.0016 * SR))
    droplets = signal.lfilter([1], [1, -droplet_decay], pops(count=2000, scatter_db=0.0))
    droplets = uniform_filter1d(droplets, size=30)
    flow = unit(2.5 + rush + (1 - rush) * droplets / droplets.mean())
    jet = flow * (rng.standard_normal(N) + 0.23 * unit(pops(count=9000, scatter_db=3.0)))
    hiss = np.zeros(N)
    for state, spectrum in enumerate([dry_spectrum, milk_spectrum, foam_spectrum]):
        share = np.clip(1 - abs(fill.clip(0, 2) - state), 0, 1)
        hiss += share * coloured(jet, spectrum)
    hiss = unit(filtered(hiss, lambda f: amp(sum(
        lift * resonance(f, hz, width) for hz, width, lift in nozzle_modes))))
    return amp(hiss_db) * flutter(hiss, patchy_db=2.0, top_db=curves(sharpness)[0]) * supply()


def scene():
    """The machine in the kitchen, over the room's quiet."""
    background = kitchen(quiet(), near_db=-18, room_db=-36, side_db=3.0) + hum()
    whine = kitchen(motor(), near_db=-28, room_db=-19, side_db=-9)
    works = rattle() + clicks_and_bumps() + rasp() + relay() + thin(valve())
    drive = kitchen(works, near_db=-9.5, room_db=-11.0, side_db=1)
    flow_db = throttle()
    milk = thin(glass(froth(flow_db))) + slurp() + big_bubbles()
    bubbling = kitchen(milk, near_db=-15, room_db=-9, side_db=-5)
    splashing = kitchen(glass(pour()) + roar(), near_db=-7.5, room_db=-10.5, side_db=-4.5)
    hiss = kitchen(thin(steam(flow_db)), near_db=-7, room_db=-7.5, side_db=-3.5)
    return background + whine + drive + bubbling + splashing + hiss


def record(dry):
    """Left and right differ a little in colour; nothing passes above the band limit."""
    # f/Hz, left minus right/dB
    lean = [(400, 0.5), (800, -1.5), (2200, -0.8), (5500, 0), (8000, -1.5), (13000, 3.5)]
    top_hz = 15600
    return filtered(dry, lambda hz: amp(np.outer([0.5, -0.5], along(lean, hz))) * (hz < top_hz))


dry = scene()
out = record(dry)
log_audio(out)
```